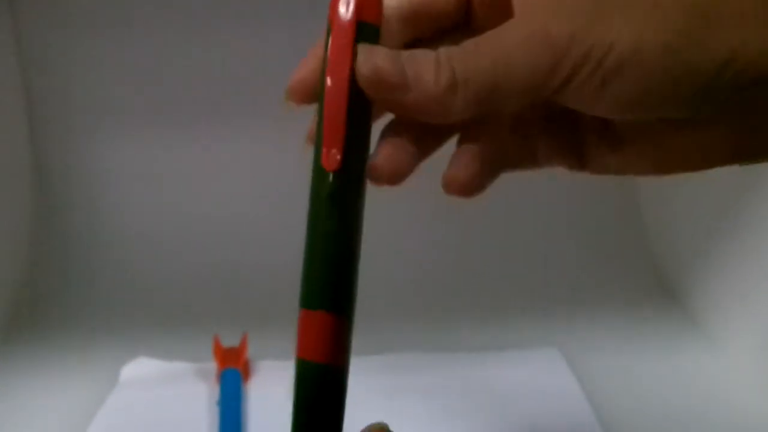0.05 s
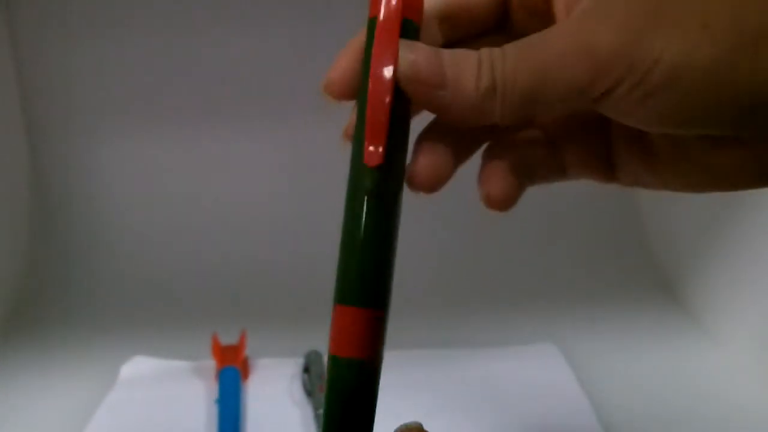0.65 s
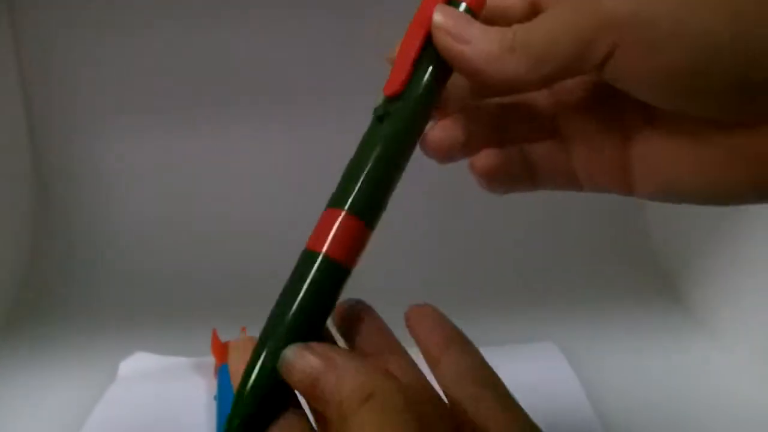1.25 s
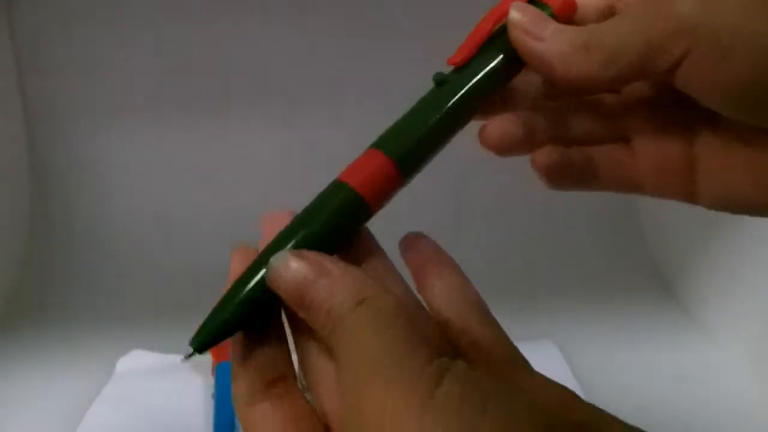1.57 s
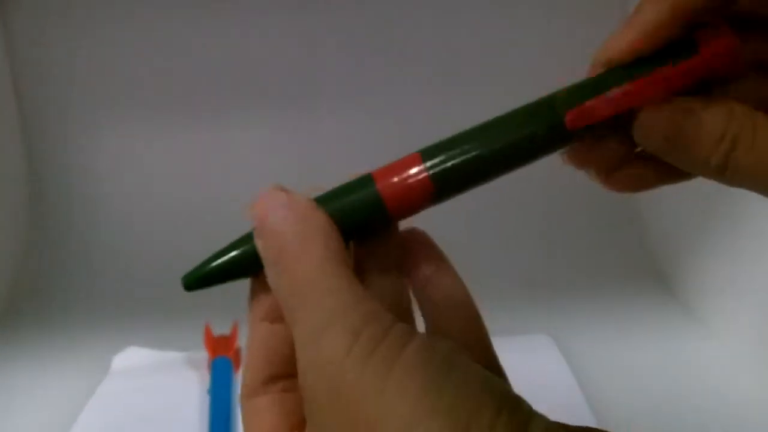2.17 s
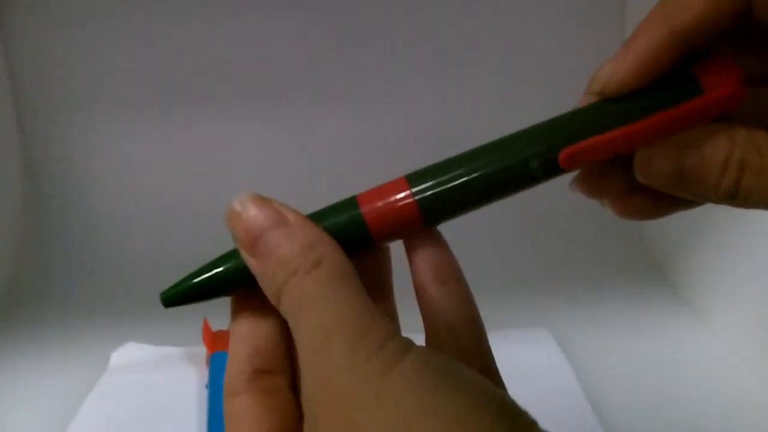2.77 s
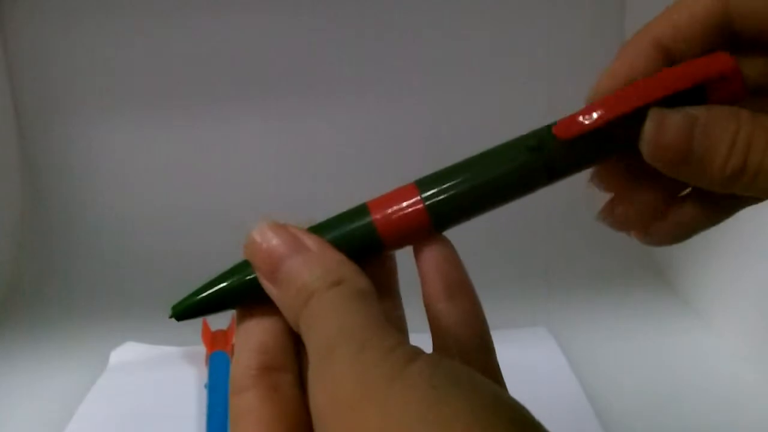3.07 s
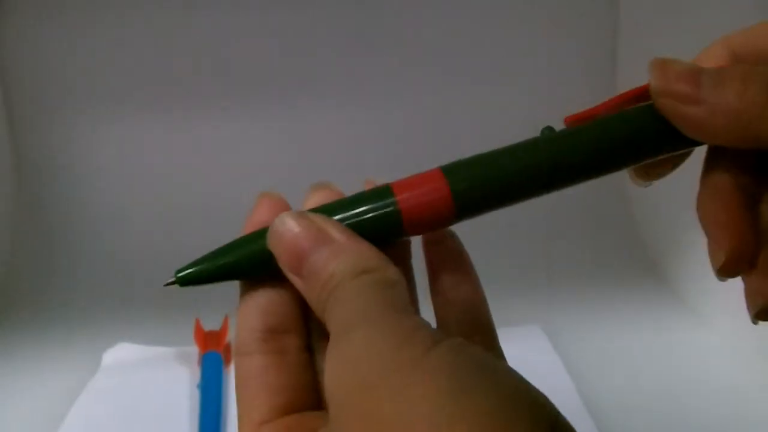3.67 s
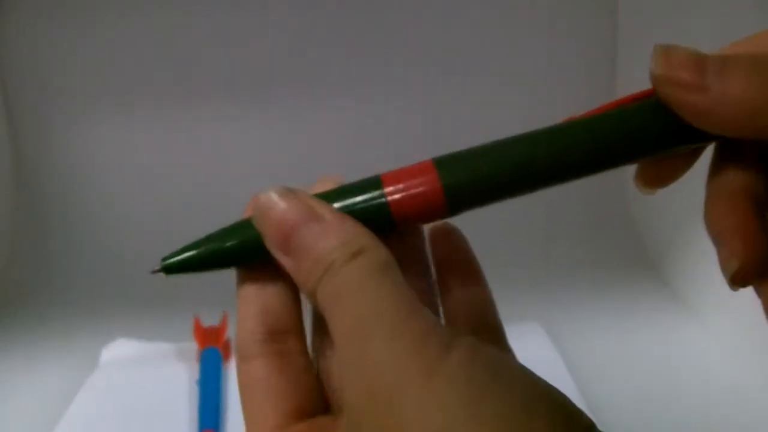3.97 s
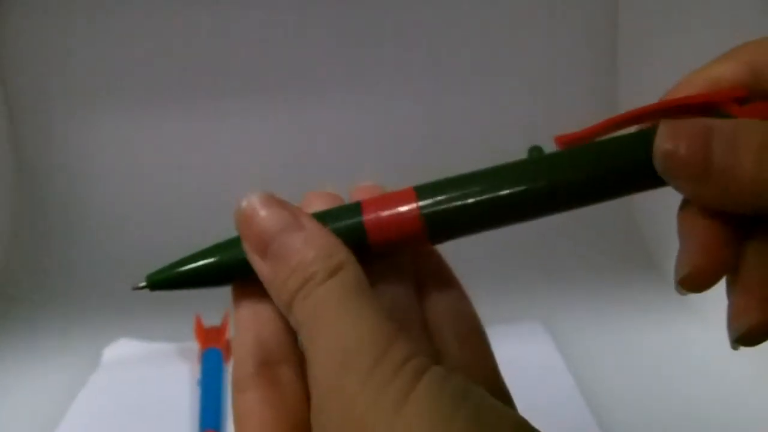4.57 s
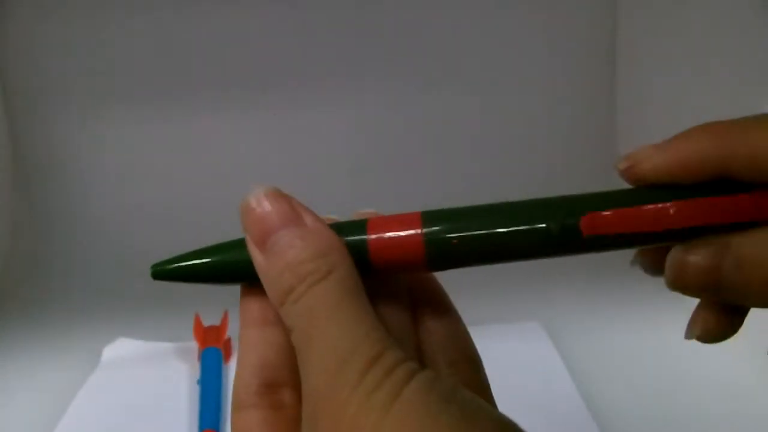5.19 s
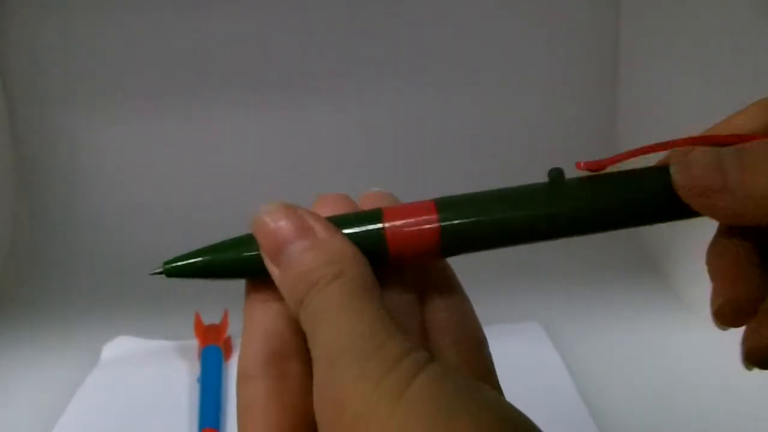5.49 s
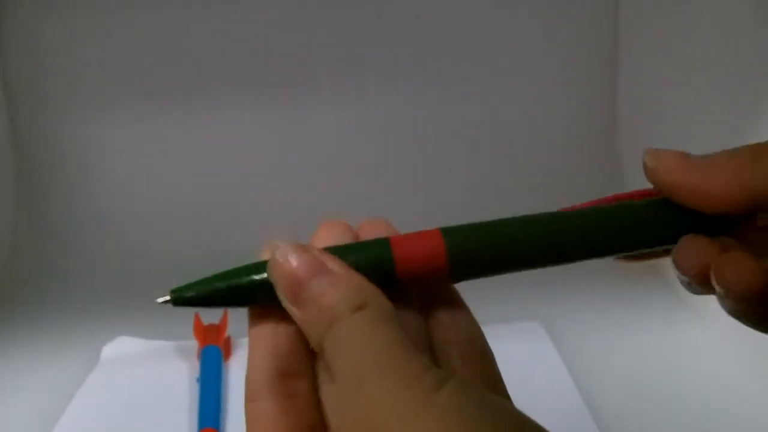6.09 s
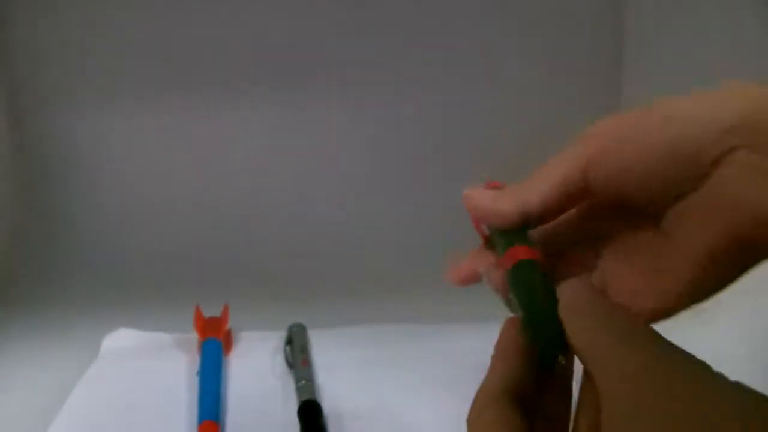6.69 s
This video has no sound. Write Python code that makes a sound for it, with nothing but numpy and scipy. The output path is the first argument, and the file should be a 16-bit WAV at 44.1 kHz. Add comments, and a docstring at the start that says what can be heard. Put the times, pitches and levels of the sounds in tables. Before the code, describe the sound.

Sharp, high clicks of a ballpoint pen pressed by hand, some in quick pairs, in a quiet room with soft hiss.

```python
"""A plastic ballpoint pen is clicked in and out by hand inside a small photo light box in a quiet room.
Each snap of the latch rings the barrel, bounces off the close walls and fades into the room.
One click has a rebound; between clicks, loose parts tick and fingers rub on the barrel.
Underneath lie a steady background rush and hiss and the hum of a small fan nearby."""
import sys
import numpy as np
from scipy import signal
from scipy.fft import rfft, irfft
from scipy.io import wavfile
from scipy.ndimage import uniform_filter1d

SR = 44100
rng = np.random.default_rng(int(sys.argv[2]) if len(sys.argv) > 2 else 0)


def put_to_file(sound):
    """Save the sound as 16-bit audio at rate SR, in the file named by the first command-line argument."""
    columns = np.atleast_2d(sound).T  # one column per channel
    safe = np.clip(columns, -1, 1)
    whole_steps = np.round(safe * 32767)
    wavfile.write(sys.argv[1], SR, whole_steps.astype(np.int16))


N = 305958
TIME, FREQS = np.arange(N) / SR, np.fft.rfftfreq(N, 1 / SR)
TAIL_TIME = np.arange(SR // 3) / SR
SLIDE_S = 0.002  # scrape leading into each contact


# Pen clicks. Crack lifts the spectrum around the main ring; barrel is the mode the grip leaves free.
# start_s, level_db, crack_db, ring_hz, barrel_hz, barrel_db, echo_db
LATCH_CLICKS = [ (1.794, -12.5, 2.5, 9160, 5500, -13, 5), (2.1339, 7, 7, 9800, 2930, -20, -1.5),
                (2.1784, -8, -1, 9000, 5440, -16, 2.5), (2.6472, -4.5, -0.5, 9250, 5130, -12, -1.5),
                (3.3368, 13.5, 0.2, 9400, 3890, -10, -5), (4.5903, 6.5, 1.5, 9700, 3000, -11, 1),
                (4.7846, -9.5, 4, 9530, 5200, -16, 5), (5.5289, 12, -1, 9400, 4150, -13, -4.5), ]

def latch_clicks():
    """The button locks the refill out or lets it spring back; softer snaps have more clack, less body."""
    out = np.zeros((2, N))
    for start_s, level_db, crack_db, ring_hz, barrel_hz, barrel_db, echo_db in LATCH_CLICKS:
        click = snap(ring_hz, barrel_hz, barrel_db,
                     clack_db=crack_db + 1 - 0.12 * level_db,
                     body_db=crack_db - 0.5 + 0.14 * level_db, top_db=crack_db,
                     second_ms=0.8, second_db=-3.5, crunch_s=0.0006, slide_db=-29)
        add(out, start_s - SLIDE_S, from_db(level_db) * light_box(click, echo_db, wall_ms=2.8))
    return out


def snap(ring_hz, barrel_hz, barrel_db, clack_db, body_db, top_db,
         second_ms, second_db, crunch_s, slide_db):
    """The cam slides off its tooth, then two gritty contacts in quick succession ring the pen."""
    t = TAIL_TIME[:2048] - SLIDE_S
    since_second = t - second_ms / 1000
    slide = from_db(slide_db) * (t <= 0) * np.exp(-abs(t) / 0.0011)
    first = (t > 0) * np.exp(-abs(t) / crunch_s)
    second = from_db(second_db) * (since_second > 0) * np.exp(-abs(since_second) / crunch_s)
    force = (slide + first + second) * rng.choice([-1, 1], len(t))
    hz = np.fft.rfftfreq(len(t), 1 / SR)
    eq = [(3500, clack_db), (5000, body_db), (7500, body_db),
          (9100, 0.021), (10200, 0.0021), (11800, top_db)]
    free_modes = [(ring_hz, RING_WIDTH_HZ, 0), (barrel_hz, BARREL_WIDTH_HZ, barrel_db)]
    gain = pen_resonance(hz, free_modes) * from_db(at_hz(eq, hz))
    return unit_energy(shape_burst(force, gain))[None]


# The plastic ring of the pen: pitch_hz, width_hz, level_db
PEN_RESONANCES = [ (2050, 830, -25), (2980, 280, -16.5), (3300, 250, -19.5), (4050, 380, -16),
                  (5080, 400, -13.5), (5514, 220, -11.5), (6170, 370, -12), (6650, 320, -12),
                  (7400, 450, -16), (8300, 610, -11), (9170, 450, -19), (10290, 500, -7.5),
                  (11030, 600, -14), (12000, 778, -17.5), (13950, 490, -21.5), (15100, 250, -21), ]
RING_WIDTH_HZ, BARREL_WIDTH_HZ = 740, 240

def pen_resonance(hz, free_modes):
    """Gain of the pen's own modes and of those that move with refill and grip, over a broadband floor."""
    power = sum(from_db(2 * level_db) / (1 + ((hz - pitch_hz) / width_hz) ** 2) ** 2
                for pitch_hz, width_hz, level_db in list(PEN_RESONANCES) + free_modes)
    floor = from_db(-66) * hz / (hz + 1200)
    return np.sqrt(power + floor)


# Small ticks of loose parts, and one louder rebound just after a click:
# start_s, level_db, lows_db, highs_db
PEN_TICKS = [ (0.9502, -29, -4, -2), (1.229, -26, 7, 12), (2.876, -27.5, 6, 3), (2.951, -26, 4, 1),
             (4.0612, -29.5, 1, 4), (4.2032, -24, 6, -2), (4.6135, -10, -5, -2), (5.231, -25.5, 6, 0),
             (6.577, -34, 0, 6), ]

def pen_ticks():
    """The plunger and other loose parts touch lightly or rebound, briefly ringing the pen."""
    out = np.zeros((2, N))
    for start_s, level_db, lows_db, highs_db in PEN_TICKS:
        tick = snap(ring_hz=9460, barrel_hz=8400, barrel_db=-6,
                    clack_db=lows_db + 5, body_db=lows_db, top_db=highs_db,
                    second_ms=0.78, second_db=-4, crunch_s=0.0005, slide_db=-9)
        add(out, start_s - SLIDE_S, from_db(level_db) * light_box(tick, echo_db=-1, wall_ms=4.5))
    return out


# Skin sliding on the barrel, each a bell-shaped swell: centre_s, half_length_s, level_db
FINGER_RUBS = [(3.93, .035, -60), (5.166, 0.03, -55.5), (5.24, 0.014, -57), (5.906, 0.023, -54),
               (6.91, .045, -59)]

def finger_rubs():
    """Finger friction excites the pen's modes; soft skin favours the lower ones."""
    pressure = sum(from_db(level_db) * np.exp(-((TIME - centre_s) / half_length_s) ** 2 / 2)
                   for centre_s, half_length_s, level_db in FINGER_RUBS)
    skin_eq = from_db(at_hz([(7000, 7), (9300, 1), (12000, 5)], FREQS))
    gain = pen_resonance(FREQS, [(9450, RING_WIDTH_HZ, -2)]) * skin_eq
    friction = stereo_noise(PORT_CORRELATION, N)
    return pressure * unit_rms(equalise(friction, gain))


# Tone of the box and room reverbs; the pen throws its main ring mostly forwards: freq_hz, gain_db
BOX_EQ = [(1000, -1), (3000, -3), (5000, 0), (7500, 0), (9400, -1), (15000, 1.5)]
ROOM_EQ = [(1000, -9), (3500, -3), (6300, 1), (9400, -2.5), (11800, -1), (15000, -2)]

def light_box(sound, echo_db, wall_ms):
    """The direct sound, slaps off two close walls, the flutter of the box and the room behind it."""
    direct = arrival(0, left_lead_ms=0.01)
    near_wall = from_db(-8) * arrival(wall_ms, left_lead_ms=0.016)
    far_wall = from_db(-9.5) * arrival(wall_ms + 2.1, left_lead_ms=-0.012)
    box = from_db(-1) * reverb_tail(t60_s=0.046, build_s=0.0017, eq=BOX_EQ)
    room = from_db(-15.5) * reverb_tail(t60_s=0.27, build_s=0.0071, eq=ROOM_EQ)
    response = direct + from_db(echo_db) * (near_wall + far_wall + box) + from_db(echo_db / 2) * room
    return signal.fftconvolve(sound, response, axes=1)


def arrival(delay_ms, left_lead_ms):
    """One sound path, reaching left and right a fraction of a sample apart."""
    delay_samples = (delay_ms + np.array([[0], [left_lead_ms]])) * SR / 1000
    offset = np.arange(len(TAIL_TIME)) - delay_samples - 4
    return np.sinc(offset) * np.sinc(offset / 4) * (abs(offset) < 4)


# Stereo image of reverb and rubs at two close microphone ports (1 is mono): freq_hz, correlation
PORT_CORRELATION = [(2500, 0.8), (4000, 0.7), (6000, 0.7), (9000, 0.6), (12000, 0.13)]

def reverb_tail(t60_s, build_s, eq):
    """Dense reflections build up, then die away."""
    size = len(TAIL_TIME)
    gain = from_db(at_hz(eq, np.fft.rfftfreq(size, 1 / SR)))
    reflections = equalise(stereo_noise(PORT_CORRELATION, size), gain)
    attack = 1 - np.exp(-(TAIL_TIME / build_s) ** 4)
    decay = from_db(-60 * TAIL_TIME / t60_s)
    return unit_energy(reflections * attack * decay)


# Pan of the pen across the spectrum: freq_hz, left_minus_right_db
PORT_PAN = [(4500, 2), (7000, 3), (9300, 3.5), (11200, -3.5), (13000, 4.5), (15000, 3.5)]

def microphone_ports(sound):
    """The two ports resonate differently, so each side has its own treble colour."""
    return equalise(sound, from_db(at_hz(PORT_PAN, FREQS) * [[0.5], [-0.5]]))


# Partials of the fan's hum: pitch_hz, level_db
HUM_PARTIALS = [(97, -77.5), (274.5, -64.5), (366, -66), (393, -65), (442, -64), (732, -66.5), (792, -66),
                (888, -68.5), (1113, -71), (1167, -68.5), (1255, -65), (1329, -61), (1464, -67),
                (1673, -65.5), (2191, -70), (2350, -70.5), (2650, -74), (2929, -76.5), (3100, -69.5),
                (3540, -77), (3880, -72.5), (3973, -71)]

def fan_hum(trim_db, wander_hz, wander_share, flutter_db):
    """Motor and blade tones; turbulence smears the higher ones more."""
    hum = np.zeros(N)
    for pitch_hz, level_db in HUM_PARTIALS:
        wobble_hz = (wander_hz + wander_share * pitch_hz) * drift(rate_hz=45)
        phase = 2 * np.pi * np.cumsum(pitch_hz + wobble_hz) / SR
        gain = from_db(level_db + trim_db + flutter_db * drift(rate_hz=16))
        hum += np.sqrt(2) * gain * np.sin(phase)
    return hum


# Tone of the background rush and hiss, with a microphone resonance near 9.4 kHz: freq_hz, gain_db
RUSH_EQ = [(25, -9.5), (60, -18.5), (100, -8.5), (140, -13.5), (165, -17), (215, -7.5), (270, -2),
           (480, -1), (950, -7), (1350, -5.5), (2600, -14.5), (3600, -15), (4500, -18), (7500, -22.5),
           (9400, -20.5), (13000, -28.5), (16000, -30.5)]
# Stereo image of the rush and hiss (1 is mono): freq_hz, correlation
RUSH_CORRELATION = [(25, 0.3), (60, 0.4), (130, 0.94), (300, 1), (700, 0.97), (1300, 0.99), (3100, 0.91),
                    (7000, .48), (15000, 0.05)]

def rush_and_hiss(level_db):
    """Steady fan air and background hiss, centred in the mids, wide in the deep bass and the treble."""
    rush = equalise(stereo_noise(RUSH_CORRELATION, N), from_db(at_hz(RUSH_EQ, FREQS)))
    return from_db(level_db) * unit_rms(rush)


# Fader curve of the background, played around its mean and scaled by swell_depth: time_s, fader_db
BACKGROUND_FADER = [(0.0, -49), (3.46, -49), (4.21, -48), (5.84, -49.5), (6.94, -50.5)]

def background(swell_depth):
    """Rush, hiss and fan hum swell and sink a little together, just left of centre."""
    rush = rush_and_hiss(level_db=-49.5)
    hum = fan_hum(trim_db=-1, wander_hz=1.53, wander_share=0.002436, flutter_db=3)
    fader_db = np.interp(TIME, *np.transpose(BACKGROUND_FADER))
    swell_db = swell_depth * (fader_db - fader_db.mean())
    return (rush + hum) * from_db(swell_db + [[0.15], [-0.15]])


def shape_burst(force, gain):
    """Give a burst a new spectrum; minimum phase, so nothing rings before the contact."""
    spectrum = rfft(force)
    own_colour = np.sqrt(uniform_filter1d(abs(spectrum) ** 2, size=9) + 1e-12)
    cepstrum = irfft(np.log(gain / own_colour + 1e-9))
    cepstrum[1:len(cepstrum) // 2] *= 2
    cepstrum[len(cepstrum) // 2 + 1:] = 0
    return irfft(spectrum * np.exp(rfft(cepstrum)))


def stereo_noise(correlation, size):
    """White noise whose stereo width follows a table over frequency."""
    mid, side = rfft(rng.standard_normal((2, size)))
    alike = np.clip(at_hz(correlation, np.fft.rfftfreq(size, 1 / SR)), 0, 1)
    return irfft(np.sqrt(1 + alike) * mid + np.sqrt(1 - alike) * side * [[1], [-1]], size)


def drift(rate_hz):
    """A random modulator that glides between values."""
    knots = rng.standard_normal(N // 100)
    return np.interp(TIME * rate_hz, np.arange(len(knots)), knots)


def equalise(sound, gain):
    """Apply one gain per frequency bin."""
    return irfft(rfft(sound) * gain, sound.shape[-1])


def at_hz(points, hz):
    """Read a table along a log-frequency axis."""
    known_hz, values = np.transpose(points)
    return np.interp(np.log(np.maximum(hz, 1)), np.log(known_hz), values)


def from_db(db):
    """Decibels to gain."""
    return 10 ** (np.asarray(db) / 20)


def unit_energy(x):
    """Scale so that the squares of each channel sum to one."""
    return x / np.sqrt(np.sum(x ** 2, axis=-1, keepdims=True) + 1e-20)


def unit_rms(x):
    """Scale to an rms of one."""
    return x / np.sqrt(np.mean(x ** 2) + 1e-20)


def add(track, start_s, sound):
    """Mix a stereo sound into the track."""
    start = round(start_s * SR)
    track[:, start:start + sound.shape[1]] += sound[:, :N - start]


def scene():
    """The pen up front, over a quiet bed of fan and hiss."""
    bed = background(swell_depth=0.73)
    pen = latch_clicks() + finger_rubs() + pen_ticks()
    return microphone_ports(pen) + bed


def record(dry):
    """The hardest snaps just overload the input; a steep low-pass takes off the very top."""
    overloaded = np.clip(dry, -1, 1)
    cutoff_hz = 15900
    return signal.sosfilt(signal.ellip(10, 0.1, 70, cutoff_hz, fs=SR, output="sos"), overloaded)


dry = scene()
out = record(dry)
put_to_file(out)
```